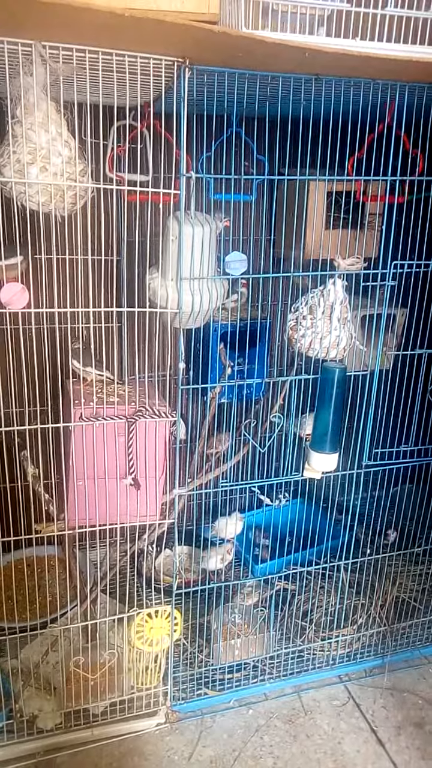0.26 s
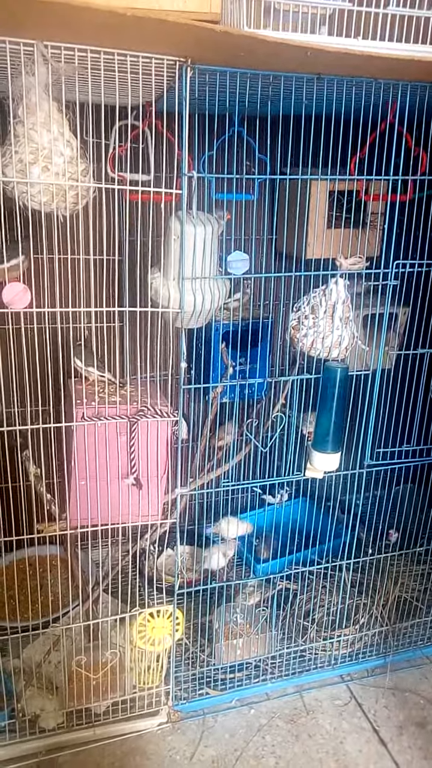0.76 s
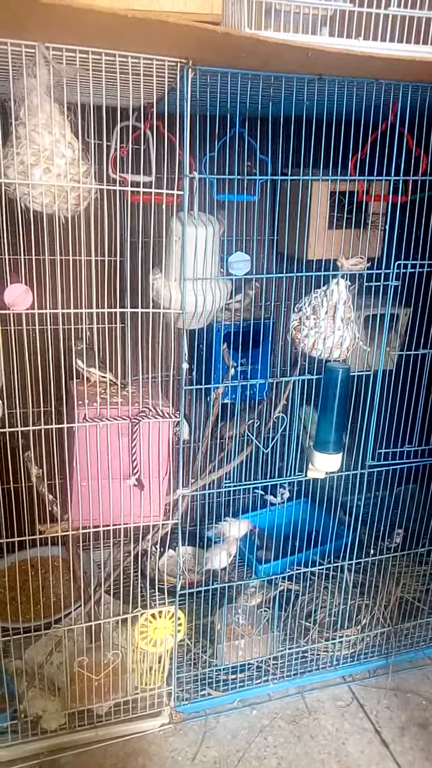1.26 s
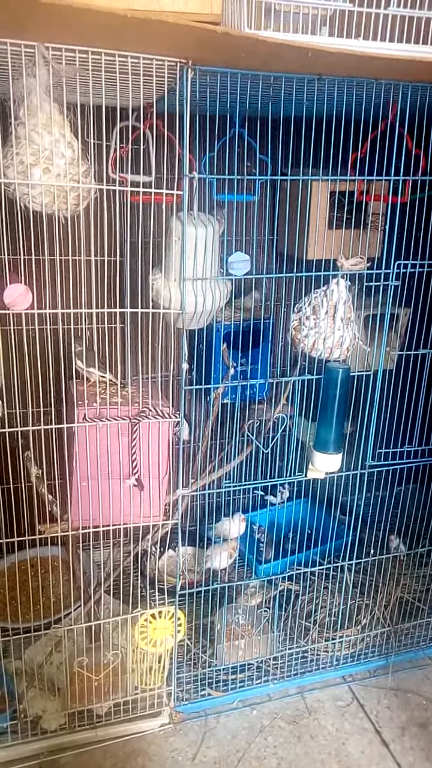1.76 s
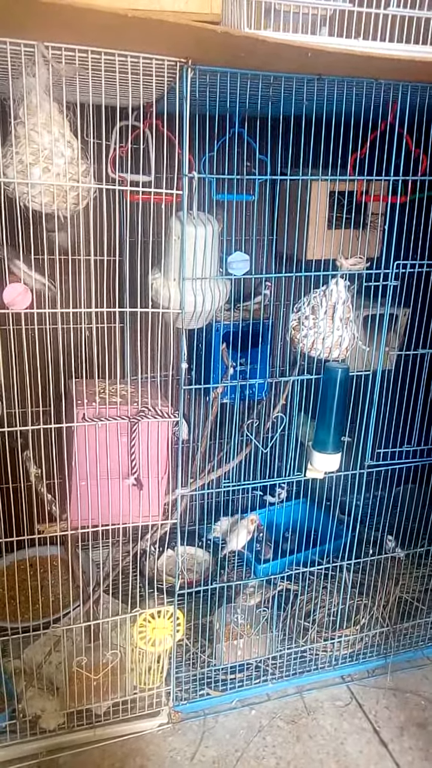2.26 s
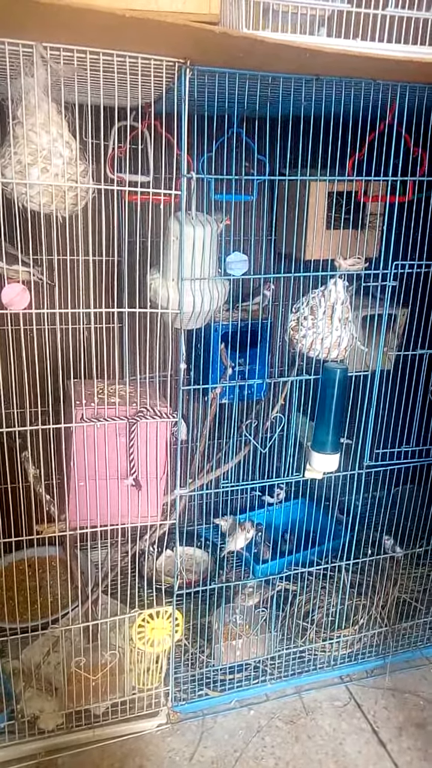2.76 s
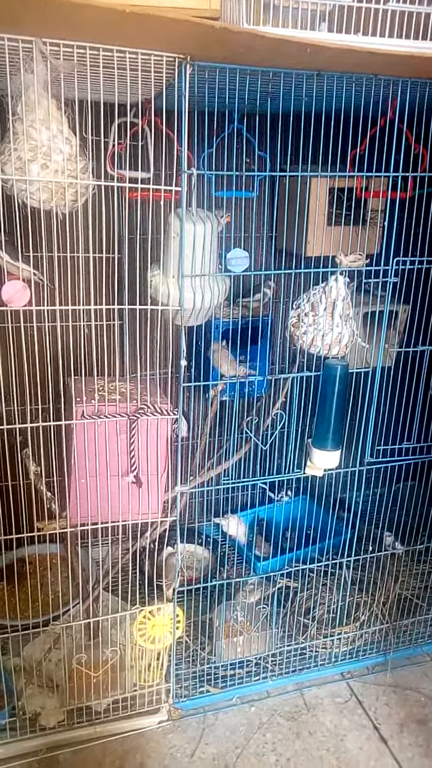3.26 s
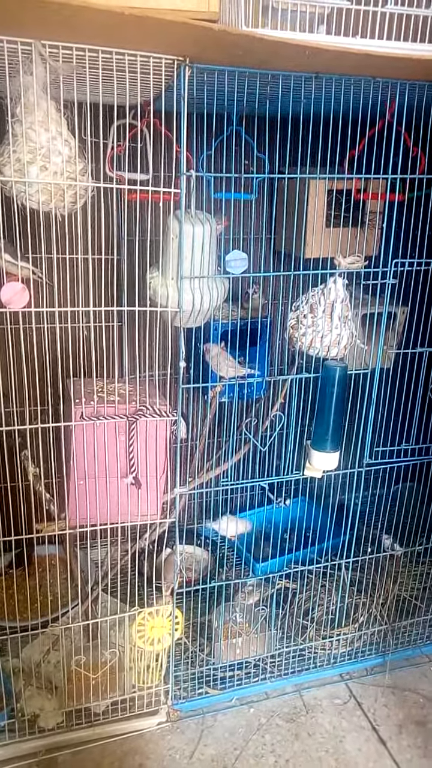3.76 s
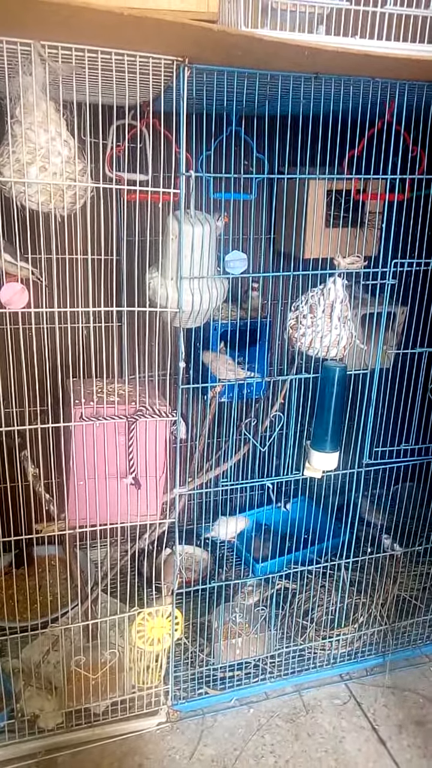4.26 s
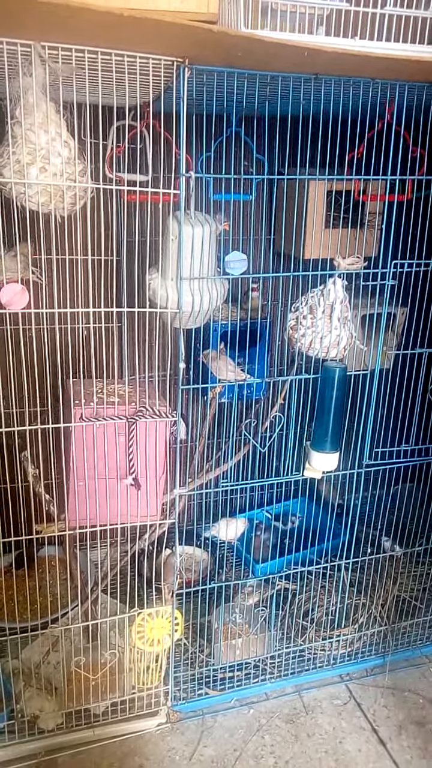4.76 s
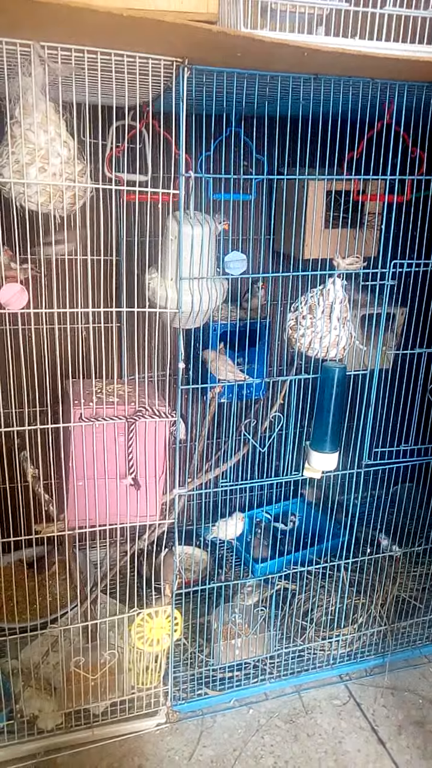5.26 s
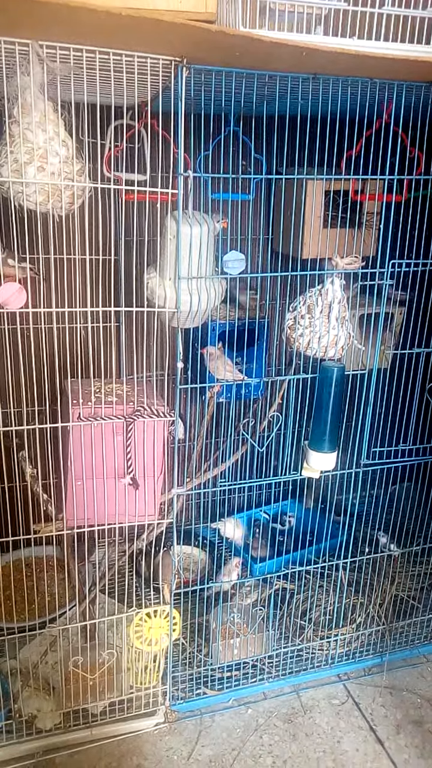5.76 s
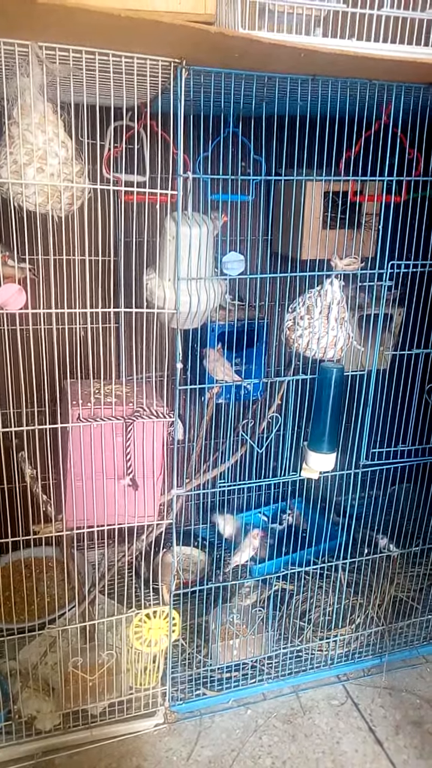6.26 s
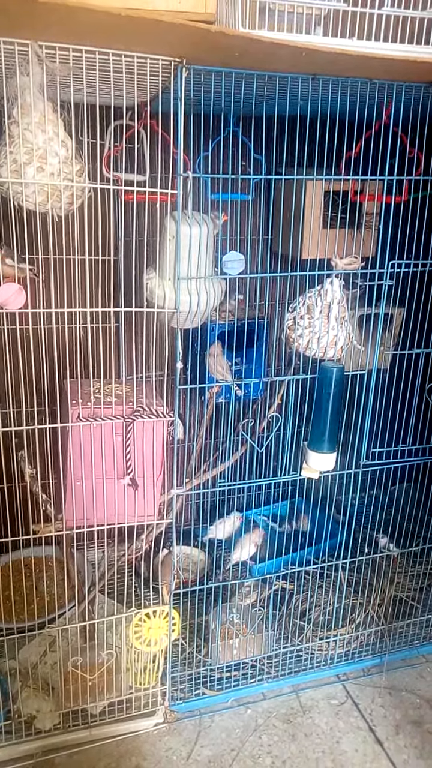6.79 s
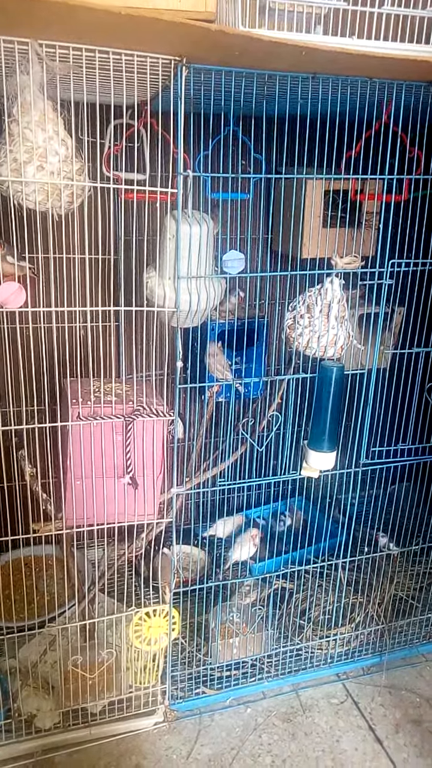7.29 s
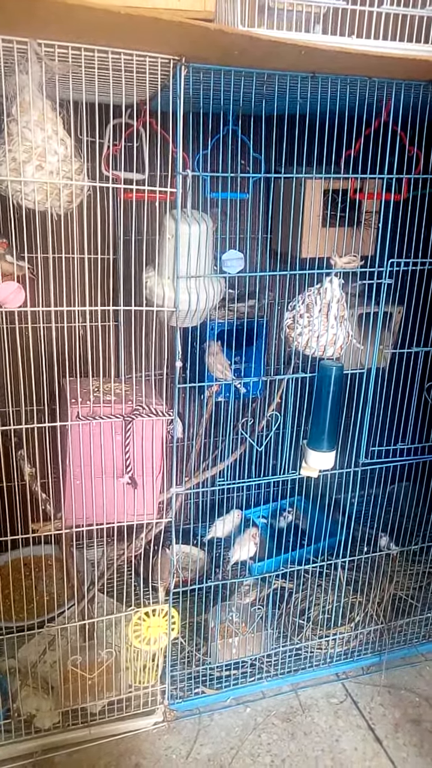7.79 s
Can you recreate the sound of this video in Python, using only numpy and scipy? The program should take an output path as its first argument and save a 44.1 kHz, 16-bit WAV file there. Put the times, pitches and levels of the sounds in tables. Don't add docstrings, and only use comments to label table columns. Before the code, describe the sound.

Small birds call inside wire cages, clear rising-and-falling whistles over harsh chatter, quick chirps, faint wire ticks and soft hollow tray thumps.

```python
import sys
import numpy as np
from scipy import signal
from scipy.fft import rfft, irfft, next_fast_len
from scipy.io import wavfile
from scipy.ndimage import uniform_filter1d

SR = 44100
rng = np.random.default_rng(int(sys.argv[2]) if len(sys.argv) > 2 else 0)


def generate_wav(signal):
    frames = np.transpose(np.atleast_2d(signal))
    scaled = np.clip(frames, -1, 1) * 32767
    pcm = np.round(scaled).astype(np.int16)
    wavfile.write(sys.argv[1], SR, pcm)


def nominal_scale(level):
    x = np.asarray(level, float) / 20
    return 10 ** x


N = 354123


def at_hz(points, hz):
    point_hz, value = np.transpose(points)
    return np.interp(np.log(hz + 1), np.log(point_hz), value)


def rms_one(x):
    return x / np.sqrt(np.mean(x ** 2) + 1e-20)


def coloured(x, gain_at):
    size = next_fast_len(len(x))
    hz = np.arange(size // 2 + 1) * SR / size
    return rms_one(irfft(rfft(x, size) * gain_at(hz), size)[:len(x)])


def drift(n, rate_hz):
    return coloured(rng.standard_normal(n), lambda hz: 1 / (1 + (hz / rate_hz) ** 2))


def swell(n, rise, power=1.38):
    u = np.arange(n) / n
    rise = np.clip(rise, .02, .95)
    return np.sin(np.pi / 2 * np.minimum(u / rise, (1 - u) / (1 - rise))) ** power


def add(out, s, piece):
    i = int(s * SR)
    out[i:i + len(piece)] += piece[:N - i]


# f/Hz, level/dB per Hz
AIR = [(15, -59.5), (25, -21.5), (152, -6.5), (233, -6.5), (349, -6), (647, -9.5), (781, -10),
       (1080, -11.5), (1750, -13), (4030, -16), (15500, -39)]


def air():
    air_db = -57
    return nominal_scale(air_db) * coloured(rng.standard_normal(N), lambda hz: nominal_scale(at_hz(AIR, hz)))


# t/s, level/dB
FLOCK = [(0.0, -50), (1.99, -33), (2.17, -18.5), (2.75, -40.5), (3.26, -34), (3.42, -54), (5.16, -34.5),
         (5.63, -49), (6.44, -38.5), (7.13, -40.5), (7.38, -17), (8.03, -45)]


def far_birds(hushed):
    flock = np.zeros(N)
    for centre_hz in (2000, 2700, 3500, 4400, 5500):
        width_hz = 0.12 * centre_hz
        band = coloured(rng.standard_normal(N), lambda hz: 1 / (1 + ((hz - centre_hz) / width_hz) ** 4))
        flock += band * nominal_scale(3.5 * drift(N, 10))
    s, db = np.transpose(FLOCK)
    ride_db = np.interp(np.arange(N) / SR, s, db) - 18.5
    return hushed * nominal_scale(ride_db) * rms_one(flock)


# f/Hz, level/dB per Hz
BEAK = [(530, -75.5), (900, -62.5), (1470, -10.5), (1860, -7), (2500, -8), (2960, -3), (4760, -8),
        (6800, -14), (7750, -28.5), (13400, -17), (15500, -42.5)]


def tone(pitch_hz, overtones_db, beak, strain_db=0):
    phase = 2 * np.pi * np.cumsum(pitch_hz) / SR
    out = np.zeros(len(phase))
    for k, db in enumerate(overtones_db):
        colour_db = beak * (at_hz(BEAK, (k + 1) * pitch_hz) - at_hz(BEAK, pitch_hz))
        strain_share = 0 if k == 0 else 1 if k == 1 else -3.5
        broken_db = min(3 * k, 7) * drift(len(phase), 50)
        level = nominal_scale(db + colour_db + strain_share * strain_db + broken_db)
        out += level * np.sin((k + 1) * phase)
    return np.sqrt(2) * out


def gliding_notes(rows, glide, shake):
    steady_above_db, steady_per_db = -26.5, .06
    out = np.zeros(N)
    for s, length, first_hz, db in rows:
        n = int(length * SR)
        wobble = max(shake - steady_per_db * max(db - steady_above_db, 0), 0)
        pitch = first_hz * np.linspace(1, glide, n) * (1 + .045 * wobble * drift(n, 180))
        level = swell(n, .3 + max(glide - 1, 0), power=.6) * nominal_scale(db + 6 * wobble * drift(n, 200))
        add(out, s, level * tone(pitch, [0, -30, -42], beak=0.39))
    return out


# t/s, length/s, first f/Hz, level/dB
UPSTROKES = [(.534, 0.052, 1584, -41), (1.066, 0.029, 2314, -27), (1.124, 0.015, 2557, -23.5),
             (1.545, 0.048, 3880, -33), (1.621, 0.028, 3015, -11.5), (2.528, 0.016, 2780, -28),
             (2.527, 0.019, 1448, -39), (5.543, .075, 2330, -45), (6.526, 0.094, 1555, -47),
             (6.869, .06, 2425, -40.5), (7.224, 0.051, 3150, -21), (7.294, 0.038, 2820, -22),
             (7.36, 0.096, 3880, -33.5), (7.783, 0.043, 3277, -35.5)]
LIFTS = [(0, .014, 3240, -32), (0, 0.0076, 4480, -33), (.565, .012, 3770, -12.5),
         (1.049, 0.018, 3570, -30.5), (2.832, 0.024, 3980, -47.5), (3.027, 0.013, 3500, -29.5),
         (3.915, 0.058, 5260, -42), (5.532, .049, 2036, -53), (6.581, 0.033, 2256, -40),
         (6.677, .052, 2513, -33), (7.87, 0.084, 2738, -33), (7.954, 0.019, 3300, -21.5),
         (7.987, .037, 2460, -33)]
HELD = [(.534, 0.029, 3336, -20), (.542, 0.012, 3970, -21.5), (.599, 0.025, 1945, -37.5),
        (.535, 0.061, 9000, -45.5), (1.03, .03, 3030, -37.5), (1.087, 0.022, 2968, -21),
        (1.142, 0.013, 4010, -35), (1.708, 0.016, 3175, -17), (2.526, 0.022, 4610, -38),
        (3.074, .019, 3500, -33.5), (4.117, 0.029, 3410, -33), (5.61, 0.029, 8030, -56),
        (5.771, .031, 5700, -46), (5.803, .07, 6650, -62), (2.528, 0.046, 7860, -62),
        (5.851, .033, 3194, -32), (6.482, 0.0061, 3340, -29), (6.619, 0.017, 3736, -31.5),
        (6.511, .028, 5570, -40), (6.606, 0.03, 5470, -42), (6.462, .18, 6550, -57),
        (7.206, 0.024, 3034, -34), (7.247, 0.061, 3850, -31.5), (7.287, 0.065, 2000, -57),
        (7.322, .035, 3750, -23.5), (7.245, 0.088, 7650, -58.5), (7.426, .065, 3900, -32.5)]
DOWNSTROKES = [(.572, 0.026, 3434, -11.5), (.603, 0.036, 2863, -23.5), (.624, 0.03, 3570, -25),
               (.595, 0.078, 5800, -40.5), (.596, 0.055, 8800, -53), (1.106, 0.026, 2558, -25.5),
               (1.575, 0.023, 2650, -45), (1.596, .027, 4590, -17), (1.645, 0.051, 4060, -21),
               (2.56, .06, 2990, -32.5), (5.1, .087, 4200, -45), (7.176, 0.039, 4020, -28),
               (7.298, 0.019, 5500, -25), (7.875, 0.062, 3830, -34), (7.997, 0.054, 3570, -34)]
DIVES = [
    (1.669, .055, 4874, -18),
    (5.797, .055, 4020, -30),
]


def warble():
    return (gliding_notes(UPSTROKES, glide=1.3, shake=0.48)
            + gliding_notes(LIFTS, glide=1.07, shake=0.68)
            + gliding_notes(HELD, glide=1.005, shake=0.57)
            + gliding_notes(DOWNSTROKES, glide=.925, shake=0.62)
            + gliding_notes(DIVES, glide=.64, shake=.3))


def pulsed_call(n, pitch_hz, rough, throat_hz, width, far_db):
    arch_depth = .13 * min(1, (.07 * SR / n) ** 3)
    arch = 1 - arch_depth * np.linspace(-1, 1, n) ** 2
    jitter = 1 + 0.1198 * rough ** 2 * drift(n, 201.6)
    phase = 2 * np.pi * np.cumsum(pitch_hz * arch * jitter) / SR
    pulses = rms_one(sum(np.cos(k * phase) for k in range(1, 22)))
    breath = rms_one(rng.standard_normal(n) * (0.69 + np.cos(phase)))
    flicker = nominal_scale(2.5 * rough * drift(n, 90))
    bars_db = 4 * rng.standard_normal(40)

    def throat(hz):
        peak_db = -np.minimum(4.56 * (np.log2((hz + 1) / throat_hz) / width) ** 2, 22)
        dull_db = -far_db / (1 + (6800 / (hz + 1)) ** 12)
        comb_db = np.interp(hz, 400 * np.arange(40), bars_db)
        return nominal_scale(.5 * at_hz(BEAK, hz) + peak_db + dull_db + comb_db)
    return coloured(flicker * ((1 - rough) * pulses + rough * breath), throat)


# t/s, length/s, level/dB, throat f/Hz, throat width/octaves
SNAPS = [(0, 0.037, -43, 3780, 0.6), (.529, .12, -27, 4300, 0.31), (1.592, 0.07, -25.5, 4600, 0.72),
         (2.527, .11, -31, 4020, 0.86), (1.868, 0.07, -35, 3040, .3), (1.87, 0.053, -30.5, 6800, 0.43),
         (6.051, 0.26, -39.5, 2740, 0.63), (6.428, .034, -30, 4100, 0.39), (6.783, 0.063, -24, 4360, .22),
         (6.842, 0.52, -46, 2760, 1), (7.048, 0.073, -31, 4300, 0.22), (7.19, 0.13, -27.5, 3730, 0.38),
         (7.69, 0.13, -23, 4320, 0.46), (7.793, .28, -34, 3340, 0.88)]
SWELLS = [(1.15, .15, -42.5, 5600, .22), (2.98, .13, -37, 3900, 0.22), (1.029, 0.072, -26, 3890, 0.34),
          (1.724, 0.051, -23, 5550, 0.49), (1.972, .11, -21.5, 5080, 0.55), (2.109, 0.11, -21, 5030, 0.56),
          (2.225, 0.11, -21, 5200, 0.44), (2.353, 0.072, -22, 5220, 0.59), (3.85, 0.19, -35, 6160, 0.3),
          (3.87, 0.114, -49, 2290, 0.091), (3.983, 0.11, -44.5, 4960, 0.12), (5.32, .075, -21.5, 4250, 0.4),
          (6.146, 0.065, -32.5, 4940, .99), (6.493, 0.28, -39, 4120, 0.31), (3.04, 0.11, -44.5, 4400, 0.25)]
BUILDS = [
    (1.94, 0.043, -30, 3600, 0.28),
    (3.299, .11, -34.5, 2900, 0.48),
    (4.633, .085, -42, 2750, .2),
    (4.762, .072, -20, 4940, .56),
    (5.202, .065, -21.5, 4540, 0.6),
    (5.962, .075, -37, 4230, 1),
]


def rasps():
    snap_attack_s, bright_hz, bright_power = 0.008, 6540, 0.99
    low_pass = signal.butter(4, bright_hz, fs=SR, output="sos")
    high_pass = signal.butter(4, bright_hz, "high", fs=SR, output="sos")
    out = np.zeros(N)
    for rows, rise in ((SNAPS, None), (SWELLS, 0.52), (BUILDS, 0.83)):
        for s, length, db, throat_hz, width in rows:
            n = int(length * SR)
            far_db = 3.45 * max(-26.0 - db, 0) + 80 * max(.45 - width, 0)
            call = pulsed_call(n, rng.uniform(520, 720), .82, throat_hz, width, far_db)
            body = signal.sosfilt(low_pass, call)
            treble = signal.sosfilt(high_pass, call)
            push = swell(n, rise or snap_attack_s / length, power=1.03)
            add(out, s, nominal_scale(db - 3.5) * push * (body + treble * push ** bright_power))
    return out


# f/Hz, width/Hz
HUM_MODES = [(234.2, 22.5), (139, 25)]
# t/s, length/s, level/dB
UPPER_HUMS = [(0, 0.058, -60), (0.971, 0.09, -53), (1.062, .23, -45.5), (1.322, 0.18, -56),
              (1.621, 0.29, -51), (1.925, .12, -44), (2.623, 0.32, -53), (2.93, 0.12, -47),
              (3.34, 0.35, -63.5), (3.78, 0.17, -60), (5.17, 0.15, -59.5), (5.377, 0.31, -49),
              (6.515, 0.26, -58), (7.062, .13, -50), (7.195, .14, -54.5)]
LOWER_HUMS = [
    (0, 0.051, -52),
    (.35, 0.47, -56),
    (1.38, .1, -60),
    (1.72, .15, -58),
    (2.33, 0.095, -65),
    (5.5, 0.092, -59),
    (5.78, .15, -56),
    (6.28, .1, -60.5),
]


def low_hums():
    out = np.zeros(N)
    for (mode_hz, width_hz), bouts in zip(HUM_MODES, (UPPER_HUMS, LOWER_HUMS)):
        hum = coloured(rng.standard_normal(N), lambda hz: 1 / (1 + ((hz - mode_hz) / width_hz) ** 2))
        swelling = np.full(N, nominal_scale(-75))
        for s, length, db in bouts:
            add(swelling, s, nominal_scale(db) * swell(int(length * SR), 0.61, power=0.57))
        out += swelling * hum
    return out


# t/s, level/dB peak
TICKS = [
    (1.101, -42.5),
    (1.1753, -45.5),
    (4.476, -46),
    (4.513, -46.5),
    (5.032, -47.5),
    (6.337, -35.5),
    (6.824, -48.5),
]
# first t/s, last t/s, level/dB, growth/dB per beat
FLUTTERS = [
    (0.314, .49, -49.5, -3),
    (.762, .995, -57, 1.5),
    (1.361, 1.4, -56, -1.5),
    (3.66, 3.84, -62, 0),
    (3.999, 4.13, -56, 2),
    (4.398, 4.631, -53.5, -1),
    (5.465, 5.54, -44.5, -3.5),
    (6.45, 6.49, -56, 1),
]


def wire_ticks():
    beat_s, wire_hz, wire_width_hz, decay_s = .0328, 9800, 1900, 0.005
    events = list(TICKS)
    for first, last, db, grow_db in FLUTTERS:
        for k in range(int((last - first) / beat_s) + 1):
            events.append((first + beat_s * k, db + grow_db * k))
    out, t = np.zeros(N), np.arange(500) / SR
    for s, db in events:
        noise = rng.standard_normal(len(t))
        tick = coloured(noise, lambda hz: .3 + 1 / (1 + ((hz - wire_hz) / wire_width_hz) ** 2))
        level = nominal_scale(db - 6 + rng.normal(0, 2))
        add(out, s + rng.normal(0, .001), level * np.exp(-t / decay_s) * tick)
    return out


# t/s, length/s, pitch f/Hz, level/dB, throat f/Hz
CLEAR = [
    (.76, 0.034, 564, -46, 4030),
    (.89, 0.045, 550, -45.5, 3350),
    (1.325, 0.079, 637, -44, 2530),
    (2.707, 0.027, 656, -38, 4800),
    (2.897, 0.069, 624, -43.5, 2900),
    (3.266, 0.038, 598, -35.5, 2860),
    (3.622, 0.063, 830, -45.5, 3000),
    (4.885, .13, 576.3, -32, 3840),
    (6.698, 0.094, 682, -31.5, 4500),
    (6.912, .04, 689, -37.5, 4750),
]
HOARSE = [
    (.678, 0.039, 771, -36.5, 3900),
    (.852, 0.073, 572, -46.5, 2310),
    (2.77, 0.088, 563, -51.5, 5500),
    (4.363, 0.09, 596, -46.5, 4700),
    (4.394, .16, 600, -49, 2700),
    (4.6, 0.034, 640, -48, 2380),
    (5.608, 0.041, 680, -34.5, 3900),
    (7.092, 0.057, 681, -37, 3800),
]


def nasal_calls():
    throat_width_hz, narrowing_hz_per_db = 2820, 105.5
    out = np.zeros(N)
    for rows, rough in ((CLEAR, .12), (HOARSE, .55)):
        for s, length, pitch_hz, db, throat_hz in rows:
            n = int(length * SR)
            width = max(throat_width_hz - narrowing_hz_per_db * (db + 44.5), 900) / throat_hz
            call = pulsed_call(n, pitch_hz * 1.02, rough, throat_hz, width, far_db=39.5)
            add(out, s, nominal_scale(db) * swell(n, 0.17, power=0.17) * call)
    return out


# t/s, level/dB peak, ring f/Hz
LANDINGS = [
    (0.972, -36.5, 1940),
    (1.759, -38.5, 1750),
    (1.974, -35, 1190),
    (2.777, -49, 374),
    (5.883, -49.5, 1510),
    (7.15, -47, 320),
]


def landings():
    out, t = np.zeros(N), np.arange(2600) / SR
    for s, db, ring_hz in LANDINGS:
        noise = rng.standard_normal(len(t))
        thud = coloured(noise, lambda hz: hz / (hz + 300) / (1 + ((hz - ring_hz) / 700) ** 2))
        add(out, s, nominal_scale(db - 2.5) * np.exp(-t / 0.045) * thud)
    return out


def arched_whistles(rows, overtones_db, top_at, last_drop, tire_db, fall):
    out = np.zeros(N)
    for s, length, top_hz, db, depth in rows:
        n = int(length * SR)
        u = np.arange(n) / n
        climb = (1 - u / top_at) ** 2
        descent = fall * ((u - top_at) / (.9 - top_at)) ** 2
        low = np.where(u < top_at, climb, descent)
        collapse = 1 - last_drop * np.clip((u - .9) / .1, 0, 1)
        pitch = top_hz * (1 - depth * low) * collapse * (1 + .006 * drift(n, 150))
        tiring_db = tire_db * np.clip((u - .75) / 0.32, 0, 1)
        effort_db = db - 14 * low - tiring_db - 35 * (1 - collapse)
        flutter_db = 2.5 * drift(n, 70)
        strain_db = 12 * low + 20 * (1 - collapse)
        level = swell(n, 0.2, power=0.41) * nominal_scale(effort_db + flutter_db)
        add(out, s, level * tone(pitch, overtones_db, 1.0, strain_db))
    return out


# t/s, length/s, top f/Hz, level/dB, arch depth/share of top
WHISTLES = [
    (1.975, .27, 3080, -14.5, 0.39),
    (3.045, .3, 3004, -14, 0.37),
    (4.131, .265, 3113, -13.5, 0.4),
    (4.912, .27, 3002, -16, 0.42),
    (6.155, .265, 3037, -13.5, .365),
    (7.345, 0.28, 3006, -13.5, .355),
]
OVERTONES_DB = [-2, -22.5, -29, -27, -32.5]


def loud_whistles():
    return arched_whistles(WHISTLES, OVERTONES_DB, top_at=.59, last_drop=.24, tire_db=5, fall=.26)


def hush(loud):
    level_db = 10 * np.log10(uniform_filter1d(loud ** 2, size=1301) + 1e-12)
    return nominal_scale(-9 * np.clip((level_db + 26.0) / 6, 0, 1))


# t/s, length/s, top f/Hz, level/dB, arch depth/share of top
LOW_WHISTLES = [
    (4.08, 0.27, 1749, -36, 0.3),
    (4.44, 0.089, 1853, -40.5, 0.035),
    (7.705, .22, 2000, -30.5, 0.39),
]


def low_whistles():
    return arched_whistles(LOW_WHISTLES, [0, -24, -40], top_at=.58, last_drop=.1, tire_db=3, fall=.7)


def trill():
    first_s, gap_s = 6.505, 0.052
    starts = first_s + gap_s * np.arange(5)
    strokes = [(s, .034, 2540, -27.5) for s in starts]   # t/s, length/s, first f/Hz, level/dB
    riders = [(s, .03, 4300, -40) for s in starts[[0, 2, 3]]]
    return gliding_notes(strokes, glide=1.37, shake=.2) + gliding_notes(riders, glide=1.07, shake=0.68)


def room(x):
    t60_s, dull_hz, tail_cut_s = 0.21, 5560, 0.28
    t = np.arange(int(.4 * SR)) / SR
    echoes = coloured(rng.standard_normal(len(t)), lambda hz: 0.16 + 1 / (1 + (hz / dull_hz) ** 3))
    echoes = echoes * nominal_scale(-60 * t / t60_s) * (t > .003) / (1 + (t / tail_cut_s) ** 6)
    return signal.fftconvolve(x, echoes / np.sqrt(np.sum(echoes ** 2)))[:N]


def scene():
    loud = loud_whistles()
    near = warble() + trill()
    far = loud + low_whistles() + rasps() + nasal_calls()
    echo = nominal_scale(0.5) * room(far + nominal_scale(-5.5) * near)
    cage = low_hums() + wire_ticks() + landings()
    background = air() + far_birds(hush(loud))
    return (near + far + echo + cage + background)[None]


def roll_off(x):
    return signal.sosfilt(signal.butter(12, 15610, fs=SR, output="sos"), x)


def record(dry):
    threshold_db, release_db_per_s, squeeze = -18.5, 160, 0.47
    level_db = 10 * np.log10(uniform_filter1d(dry[0] ** 2, size=441) + 1e-12)
    over_db = np.maximum(level_db - threshold_db, 0)
    slope_db = release_db_per_s * np.arange(N) / SR
    held_db = np.maximum.accumulate(over_db + slope_db) - slope_db
    cut_db = uniform_filter1d(squeeze * held_db, size=301)
    return roll_off(dry * nominal_scale(-cut_db))


dry = scene()
out = record(dry)
generate_wav(out)
```